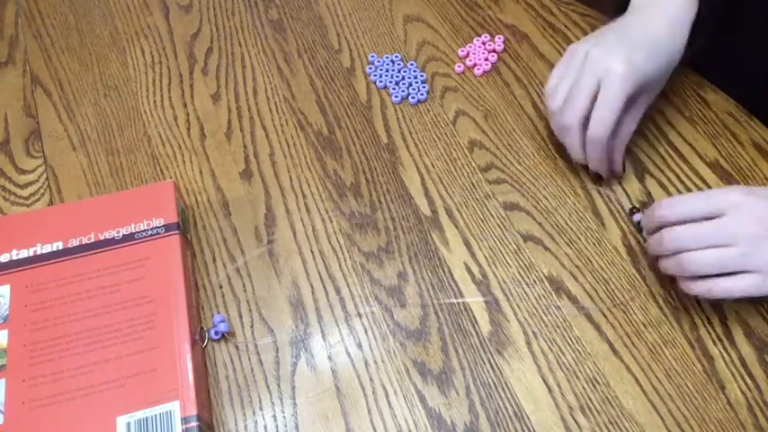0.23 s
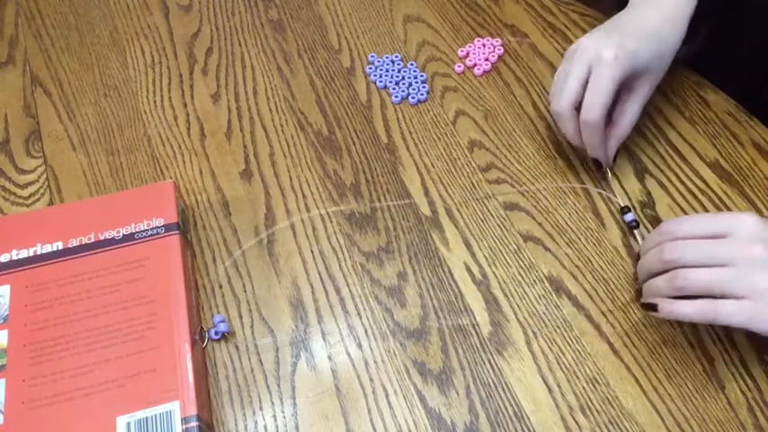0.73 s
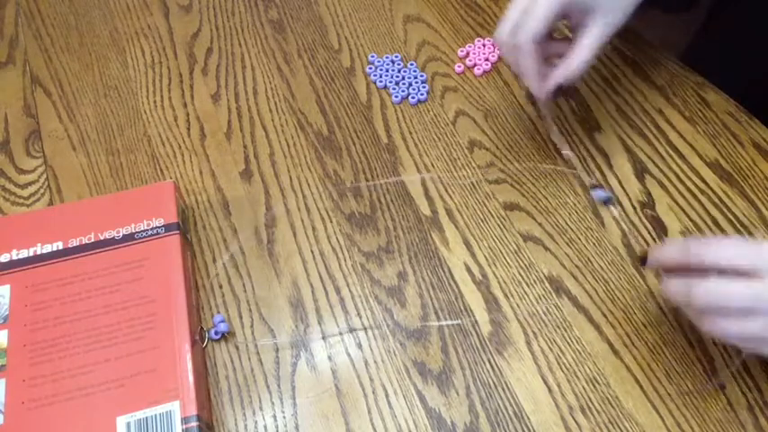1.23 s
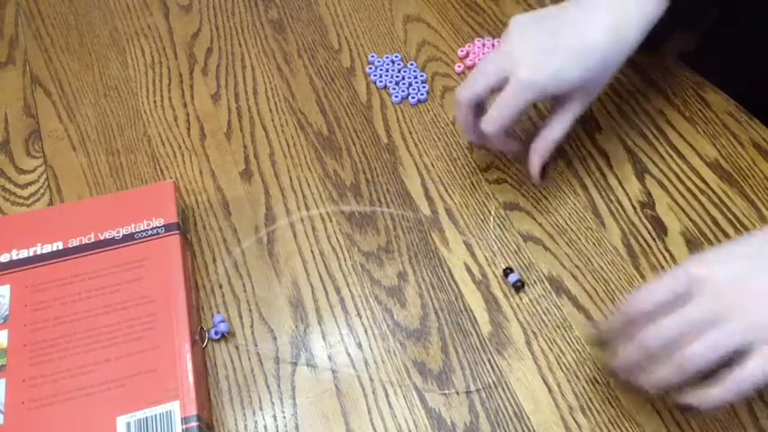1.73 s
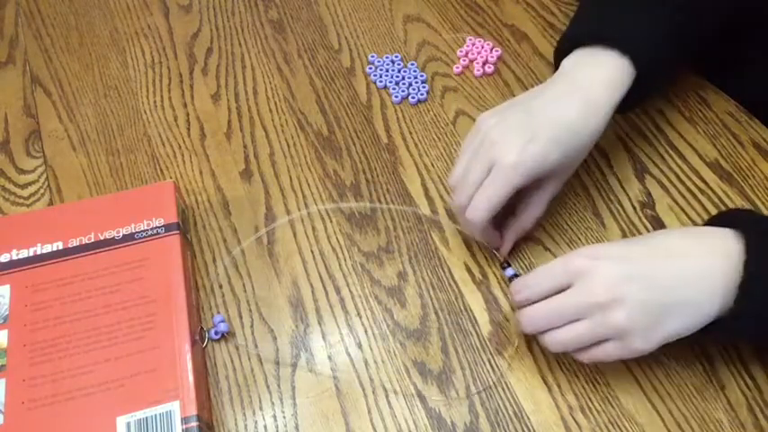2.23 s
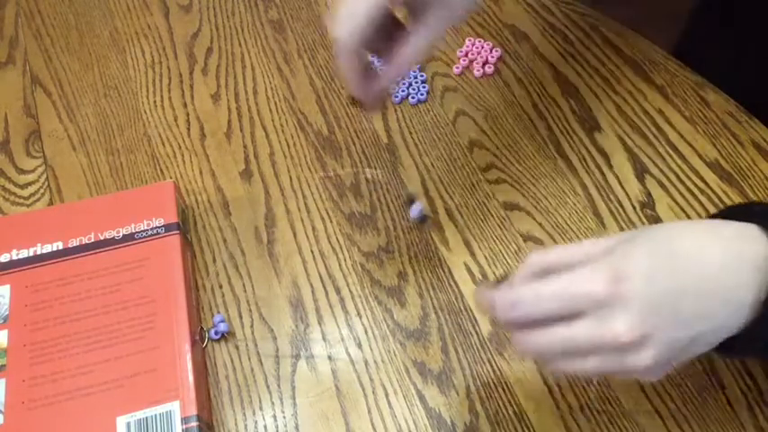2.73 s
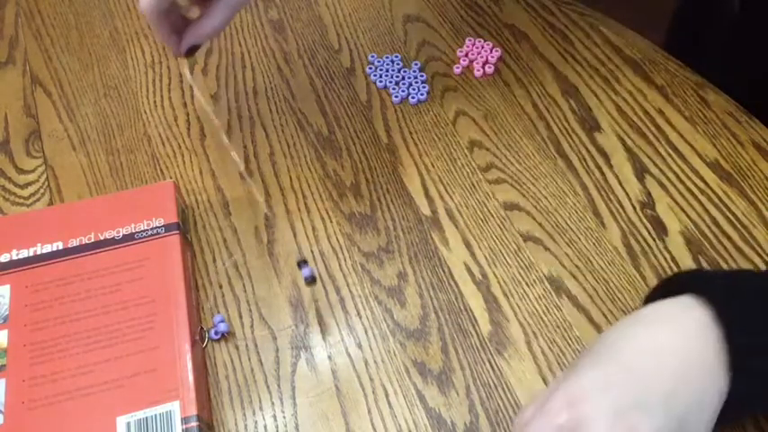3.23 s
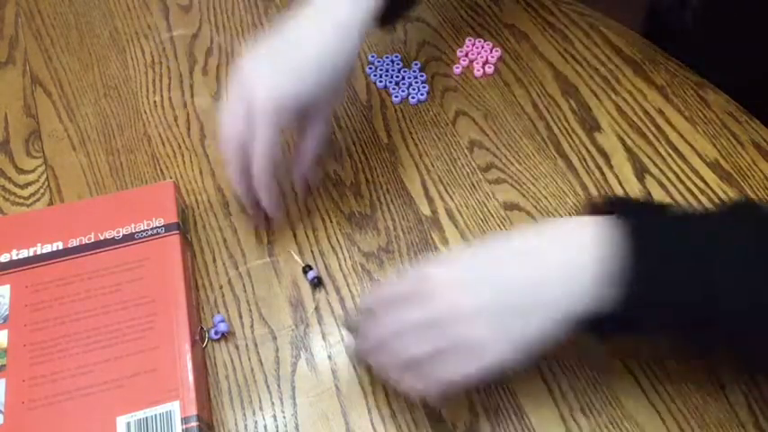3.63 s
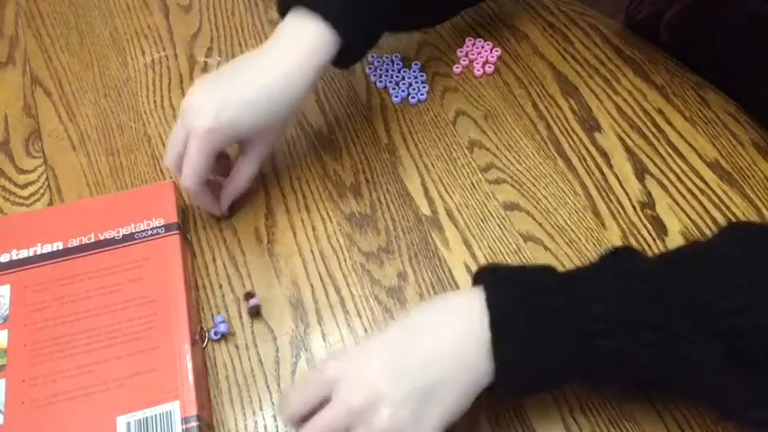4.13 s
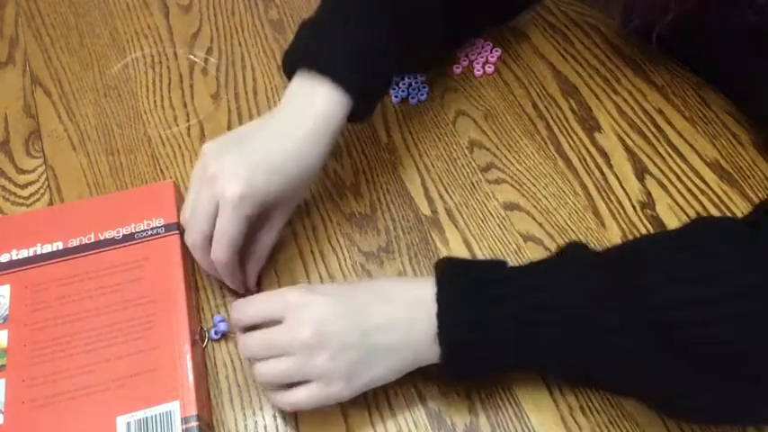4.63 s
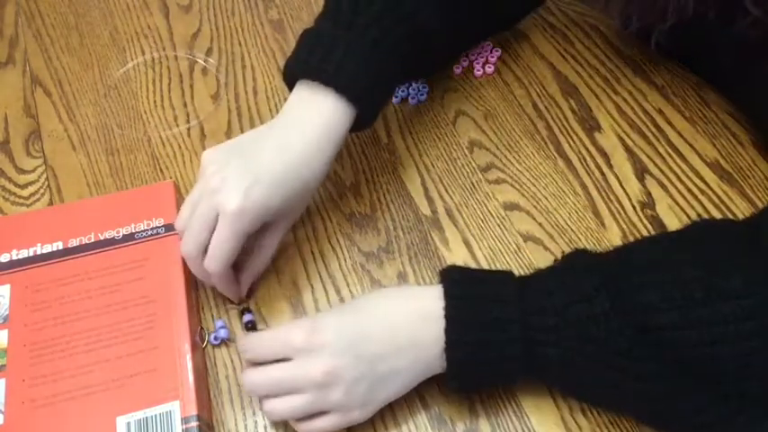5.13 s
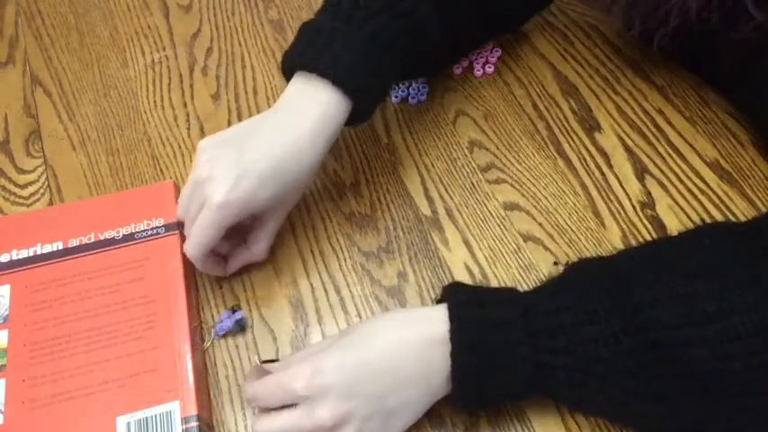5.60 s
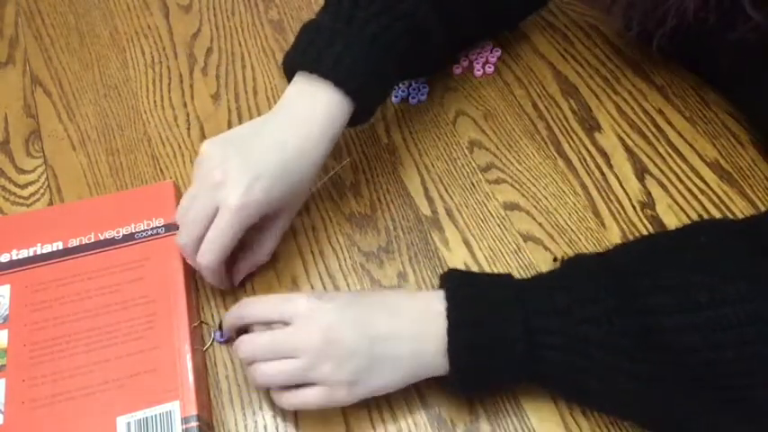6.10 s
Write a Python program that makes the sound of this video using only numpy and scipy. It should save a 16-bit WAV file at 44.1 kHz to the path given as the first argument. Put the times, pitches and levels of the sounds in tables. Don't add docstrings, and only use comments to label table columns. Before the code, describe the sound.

Close by, small plastic beads on a cord click and tap on a wooden table. A sharp clatter with a knuckle thump opens, then sparse ticks, a cluster around one and a half to two seconds, and another strong burst near three and a half. Later clicks are isolated. Faint cord brushing, a steady low hum and soft hiss fill a small, lightly reverberant room.

```python
import sys
import numpy as np
from scipy import signal
from scipy.fft import rfft, irfft
from scipy.io import wavfile

SR = 44100
rng = np.random.default_rng(int(sys.argv[2]) if len(sys.argv) > 2 else 0)


def log_audio(samples):
    frames = np.atleast_2d(samples).T
    limited = np.clip(frames, -1, 1)
    pcm = np.round(limited * 32767).astype(np.int16)
    wavfile.write(sys.argv[1], SR, pcm)


def makeup_ratio(level_db):
    decades = np.asarray(level_db, float) / 20
    return 10 ** decades


N = 280476

# freq_hz, level_db (per Hz)
AIR_COLOUR = [(79, -17.5), (135, -7), (158, -10), (175, -2.5), (236, -10), (319, -10), (352, -13),
              (382, -10), (604, -15.5), (1020, -24), (1320, -23.5), (2450, -28.5), (9710, -37),
              (10900, -38), (16000, -44)]
AIR_DB = -54

RUMBLE_DB, BOOM_DB, BOOM_RISE_S, BOOM_T60_S = -63.5, -22, 0.025, 0.44

# pitch_hz, level_db (rms), waver_db
MOTOR_LINES = [(119.8, -52.5, 1.5), (239, -67, 2.0), (356, -68, 2.0), (478, -72, 2.0)]
# pitch_hz, level_db (rms), in_step_s (when in step with the first)
ROTORS = [(59.02, -64.5, 0), (57.74, -63.7, .209), (58.13, -65.9, .307)]
# time_s, level_db
THROB_LEVEL = [(0, -56), (.45, -57.5), (.75, -50), (1, -50.5), (1.25, -53.5), (1.6, -66), (2.1, -60),
               (2.7, -65.5), (3.3, -51), (3.75, -58.5), (4.15, -48.5), (4.45, -52.5), (4.9, -66),
               (5.2, -57), (5.8, -61.5), (6.36, -57)]
THROB_HZ, PARTNER_HZ, IN_STEP_S, PARTNER_DB = 145.3, 148.84, 0.145, -5.5

# start_s, length_s, level_db (full stroke), rise_share (of the length)
BRUSHES = [
    (0.366, .25, -61, 0.37),
    (1.444, 0.21, -63, 0.87),
    (1.828, 0.19, -51, 0.4),
    (2.62, .12, -78, .3),
    (3.423, 0.28, -63, .15),
    (3.647, 0.27, -64, .53),
    (4.2, 0.24, -63, .3),
    (4.885, 0.17, -66, 0.33),
    (5.46, 0.17, -68, 0.89),
]
# freq_hz, level_db (per Hz)
CORD_COLOUR = [(900, -7), (1300, 6), (2400, -11), (3000, 3.5), (4500, 2), (7000, -6.5), (13000, -11),
               (15500, -30), (16500, -28)]
STROKE_START_DB, STROKE_END_DB = -13, -19.5

# start_s, peak_db, strongest_hz, contact_s, knuckle_hardness_db (per octave)
THUMPS = [(0.067, -38.5, 270, 0.0018, 0.1), (0.075, -28.5, 263, 0.00094, -9), (0.084, -33, 219, 0.0012, 17),
          (0.091, -20.5, 246, 0.0011, -1.5), (0.474, -49, 222, 0.0019, 7), (1.593, -36, 210, 0.0011, -5.5),
          (1.855, -41.5, 221, 0.0015, -3), (1.908, -43, 210, 0.0017, -6.5), (3.091, -50, 258, 0.0024, -12),
          (3.151, -51, 223, 0.0014, -12), (3.715, -34, 256, 0.0024, -6), (3.725, -31.5, 242, 0.001, 13),
          (3.732, -31, 278, 0.0003, 11), (3.798, -40.5, 370, 0.0032, -5), (4.928, -49, 213, 0.0012, -9),
          (5.217, -48, 188, 0.0021, -8), (5.466, -47, 210, 0.0022, -18), (5.587, -47, 517, 0.0017, 3),
          (6.192, -48, 215, 0.00063, -3)]
# pitch_hz, level_db, t60_s
TABLE_MODES = [(210, -3.5, 0.38), (253, -18, 0.053), (277.3, -9.5, 0.23), (307, -2.5, 0.05),
               (411, -2.5, 0.1), (489, -5.5, 0.13), (628, -4, 0.044), (815, -33, .1)]

# start_s, peak_db, ring_hz, wood_knock_db, sharp_edge_db
BLOWS = [(0.0666, -31.5, 3680, -15, 2), (0.094, -18.5, 6600, -13, 5.5), (0.0972, -19, 4600, -12, 1),
         (0.1046, -23, 3660, -14, -2), (0.1815, -33, 3150, -14, -10), (0.2917, -32.5, 4500, -13, -13),
         (1.4673, -37, 3470, -17, -19), (1.6219, -23.5, 6560, -13.5, 6.5),
         (1.6638, -20.5, 4150, -15.5, -2.5), (1.8517, -34.5, 8100, -28, 15), (1.8677, -28.5, 8950, -30, 8),
         (1.8776, -36, 4260, -12, 20), (1.905, -33, 4080, -5, -2), (3.3785, -17.5, 4680, -17.5, -0.5),
         (3.443, -37, 3510, -12, 1), (3.4665, -25.5, 6640, -14.5, 9), (3.4854, -36, 4630, -11, -3),
         (3.706, -33, 3980, -18, -22), (4.0335, -26.5, 3580, -4, 2.5), (4.9287, -34, 5500, -9, -2),
         (4.9472, -31.5, 3900, -7, -6), (5.5902, -27, 6700, -8.5, -2.5), (6.0597, -29.5, 4070, -6.5, -21),
         (6.259, -38, 4560, -5, -39)]
# start_s, peak_db, ring_hz
CLACKS = [(0.0266, -43, 4570), (0.058, -36, 3880), (0.3923, -39.5, 6850), (0.401, -41.5, 4100),
          (0.415, -46, 4390), (0.422, -39, 5360), (1.058, -50, 3820), (1.52, -51, 3890), (1.529, -46, 4230),
          (1.5793, -40.5, 5900), (1.6043, -39, 6000), (1.843, -44, 4230), (1.9727, -42, 3140),
          (2.074, -50, 2570), (2.359, -43.5, 4180), (2.6694, -41, 3000), (3.375, -40, 4100),
          (3.46, -36, 4100), (3.473, -32.5, 4150), (3.516, -39.5, 3350), (4.2584, -38, 2980),
          (4.265, -39.5, 3900), (4.286, -38, 5300), (4.372, -43.5, 2930), (5.7345, -43.5, 4020),
          (5.965, -44, 4270), (6.3134, -46.5, 3340)]
CLACK_WOOD_DB, CLACK_EDGE_DB = -16.5, 3
# start_s, peak_db, ring_hz
TAPS = [(0.4597, -39, 4370), (0.5359, -43, 3320), (0.8101, -44.5, 4030), (1.195, -45, 6600),
        (1.4741, -38, 3330), (1.495, -38, 4250), (2.0014, -48, 5500), (3.5309, -38.5, 3960),
        (3.538, -47, 4030), (3.5902, -43.5, 4010), (3.7187, -38.5, 3020), (3.726, -38.5, 4070),
        (3.7988, -37, 4100), (3.811, -45, 3270), (4.1665, -47, 2980), (4.495, -37, 3040),
        (5.039, -45.5, 3820), (5.521, -48, 3240), (5.586, -43, 2930), (6.051, -55, 3400),
        (6.208, -49, 4830)]
TAP_WOOD_DB, TAP_EDGE_DB = -12, -13
# pitch_hz, width_hz, lift_db
BEAD_MODES = [(1213, 420, 9), (2917, 71, 7), (3270, 78, 6.5), (3660, 65, 5.5), (4230, 130, 3),
              (4880, 175, 0.5), (7070, 480, 2.5)]
CHATTER_S, CHATTER_GROWTH_DB = 0.0021, 0.2229

# freq_hz, t60_s
ROOM_T60 = [(250, 0.28), (1300, 0.42), (3500, 0.29), (9000, 0.14), (15000, 0.2)]
# time_s, level_db
DISTANCE = [(0, 3.5), (1.2, 0.5), (1.75, 0.5), (2.5, 3), (3.4, -1), (3.75, 0.5), (4.1, 0.5), (4.5, 0),
            (5, -1), (5.6, -5), (6.1, 1.5), (6.36, -4)]
ROOM_DB, ROOM_ONSET_S = -5.5, 0.007

MIC_LOW_HZ, MIC_TOP_HZ = 52.7, 15900


def at_hz(points, hz):
    table_hz, values = np.transpose(points)
    return np.interp(np.log(hz), np.log(table_hz), values)


def in_time(rows, silent_db=-120):
    s, db = np.transpose(rows)
    return makeup_ratio(np.interp(np.arange(N) / SR, s, db, left=silent_db, right=silent_db))


def rms_one(x):
    return x / np.sqrt(np.mean(x ** 2) + 1e-30)


def peak_one(x):
    return x / (np.abs(x).max() + 1e-30)


def band(x, low_hz, high_hz):
    edges = [low_hz, min(high_hz, 0.45 * SR)]
    return signal.sosfilt(signal.butter(2, edges, "band", fs=SR, output="sos"), x)


def drift(rate_hz):
    r = np.exp(-80 * np.pi * rate_hz / SR)
    white = rng.standard_normal(N // 40 + 2002)
    slow = signal.lfilter([1], [1, -2 * r, r * r], white)[2000:]
    return np.interp(np.arange(N) / 40, np.arange(len(slow)), rms_one(slow))


def coloured(white, spectrum):
    hz = np.maximum(np.fft.rfftfreq(len(white), 1 / SR), 1)
    return rms_one(irfft(rfft(white) * makeup_ratio(at_hz(spectrum, hz)), len(white)))


def add(out, s, piece):
    at = int(s * SR)
    out[at:at + len(piece)] += piece[:N - at]


def air():
    level = makeup_ratio(AIR_DB + 0.5 * drift(6.4))
    return level * coloured(rng.standard_normal(N), AIR_COLOUR)


def rumble():
    level = makeup_ratio(RUMBLE_DB + 2.6 * drift(2.7))
    t = np.arange(SR) / SR
    for s, db, *_ in THUMPS:
        boom = makeup_ratio(db + BOOM_DB - 60 * t / BOOM_T60_S) * (1 - np.exp(-t / BOOM_RISE_S))
        add(level, s, boom)
    return level * rms_one(band(rng.standard_normal(N), 55, 100))


def hum():
    t = np.arange(N) / SR
    turn = 2 * np.pi * THROB_HZ * t
    slip = 2 * np.pi * (PARTNER_HZ - THROB_HZ) * (t - IN_STEP_S)
    partner = makeup_ratio(PARTNER_DB) * np.sin(turn + slip)
    out = in_time(THROB_LEVEL) * (np.sin(turn + 0.32 * drift(3.1)) + partner)
    first_hz = ROTORS[0][0]
    for hz, db, step_s in ROTORS:
        cycles = first_hz * t + (hz - first_hz) * (t - step_s)
        out += makeup_ratio(db - 2.5) * np.sin(2 * np.pi * cycles)
    for hz, db, waver_db in MOTOR_LINES:
        level = makeup_ratio(db + waver_db * drift(2.9))
        out += level * np.sin(2 * np.pi * hz * t + 0.5 * drift(6.2))
    return np.sqrt(2) * out


def brushes(slips_per_s=4000):
    sizes = makeup_ratio(3 * np.minimum(rng.exponential(1, N), 3)) * rng.choice([-1, 1], N)
    slips = (rng.random(N) < slips_per_s / SR) * sizes
    strokes = np.zeros(N)
    for s, length, db, rise in BRUSHES:
        full_s = s + np.clip(rise, 0, 1) * length
        strokes += in_time([(s, db + STROKE_START_DB), (full_s, db), (s + length, db + STROKE_END_DB)])
    return coloured(slips, CORD_COLOUR) * strokes


def ring(x, hz, t60):
    r = makeup_ratio(-60 / (t60 * SR))
    w = 2 * np.pi * hz / SR
    return signal.lfilter([0, np.sin(w)], [1, -2 * r * np.cos(w), r * r], x)


def thumps():
    out, t = np.zeros(N), np.arange(12000) / SR
    spots = rng.normal(0, 0.72, (len(THUMPS), len(TABLE_MODES)))
    for (s, db, spot_hz, contact, knuckle_db), spot in zip(THUMPS, spots):
        push = np.sin(np.pi * t / contact) ** 2 * (t < contact)
        body = 2.05 * ring(push, spot_hz, 0.091)
        for (hz, mode_db, t60), own_db in zip(TABLE_MODES, spot):
            tilt_db = knuckle_db * np.log2(hz / spot_hz)
            body = body + makeup_ratio(mode_db + own_db + tilt_db) * ring(push, hz, t60)
        add(out, s, makeup_ratio(db + 3.5) * peak_one(band(body, 303, 1650)))
    return out


def lift(x, hz, width_hz, db):
    r = np.exp(-np.pi * width_hz / SR)
    poles = [1, -2 * r * np.cos(2 * np.pi * hz / SR), r * r]
    resonance = signal.lfilter([(1 - r * r) / 2, 0, (r * r - 1) / 2], poles, x)
    return x + (makeup_ratio(db) - 1) * resonance


def shelf_below(x, hz, db):
    poles = signal.buttap(4)[1] * 2 * SR * np.tan(np.pi * hz / SR)
    shelf = signal.bilinear_zpk(poles * makeup_ratio(db / 8), poles * makeup_ratio(-db / 8), 1, SR)
    return signal.sosfilt(signal.zpk2sos(*shelf), x)


def bead_colour(x, hz, wood_db, edge_db):
    x = lift(x, hz, 1400, 3.05)
    x = lift(x, hz, 100, 7.2)
    for mode in BEAD_MODES:
        x = lift(x, *mode)
    x = shelf_below(x, 2600, wood_db + 6.5)
    x = shelf_below(x, 8400, 4.0 - edge_db)
    return peak_one(band(band(x, 780, 14000), 730, 14400))


def ticks():
    direct, all_round = np.zeros(N), np.zeros(N)
    t = np.arange(1024) / SR
    clacks = [row + (CLACK_WOOD_DB, CLACK_EDGE_DB) for row in CLACKS]
    taps = [row + (TAP_WOOD_DB, TAP_EDGE_DB) for row in TAPS]
    contacts = BLOWS + clacks + taps
    impact = 1.0 * (np.arange(len(t)) == 20)
    rough = rng.standard_normal((len(contacts), len(t)))
    for (s, db, hz, wood_db, edge_db), grit in zip(contacts, rough):
        length = CHATTER_S * makeup_ratio(CHATTER_GROWTH_DB * (db + 40))
        swell = (1 - np.exp(-t / 0.00077)) * np.exp(-(t / length) ** 2)
        chatter = 0.73 * impact + 0.19 * grit * swell
        heard = makeup_ratio(db + 1.0) * bead_colour(chatter, hz, wood_db, edge_db)
        add(direct, s, heard)
        add(all_round, s, np.std(heard) * rms_one(bead_colour(impact, hz, wood_db, edge_db)))
    return direct, all_round


def room(x):
    t = np.arange(int(0.6 * SR)) / SR
    edges = 120 * 2 ** np.arange(0, 7.6, 0.5)
    white = rng.standard_normal((len(edges), len(t)))
    tail = np.zeros(len(t))
    for noise, low, high in zip(white, edges, edges[1:]):
        decay = makeup_ratio(-60 * t / at_hz(ROOM_T60, np.sqrt(low * high)))
        tail += rms_one(band(noise, low, high)) * np.sqrt(high - low) * decay
    tail *= 1 - np.exp(-(t / ROOM_ONSET_S) ** 2)
    return makeup_ratio(ROOM_DB) * signal.fftconvolve(x, tail / np.sqrt(np.sum(tail ** 2)))[:N]


def scene():
    background = air() + rumble() + hum()
    cord, hands = brushes(), thumps()
    beads, beads_all_round = ticks()
    tail = room(in_time(DISTANCE) * (beads_all_round + cord) + makeup_ratio(1.0) * band(hands, 83, 590))
    return (background + cord + hands + beads + tail)[None]


def band_limit(x):
    return signal.sosfilt(signal.butter(12, 16500, fs=SR, output="sos"), x)


def record(dry):
    low_cut = signal.butter(3, MIC_LOW_HZ, "high", fs=SR, output="sos")
    top_cut = signal.ellip(8, 0.5, 30, MIC_TOP_HZ, fs=SR, output="sos")
    mix = signal.sosfilt(top_cut, signal.sosfilt(low_cut, dry))
    return band_limit(mix)


dry = scene()
out = record(dry)
log_audio(out)
```